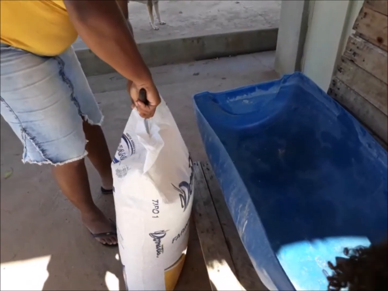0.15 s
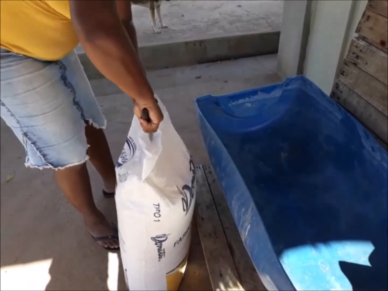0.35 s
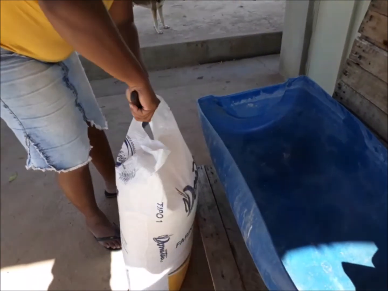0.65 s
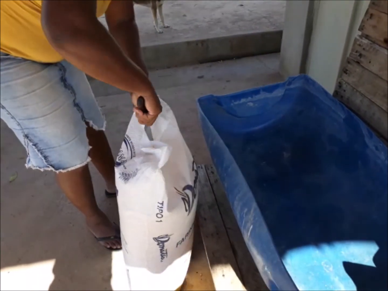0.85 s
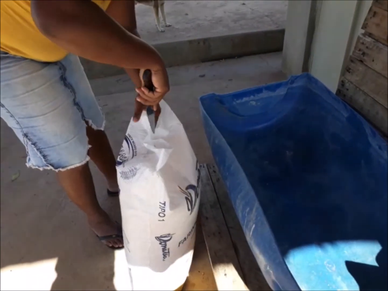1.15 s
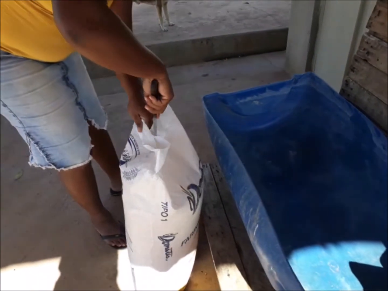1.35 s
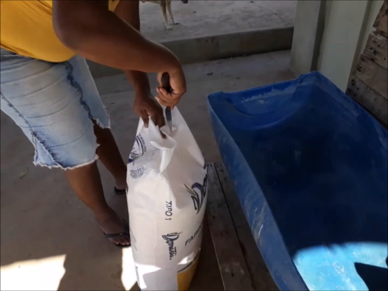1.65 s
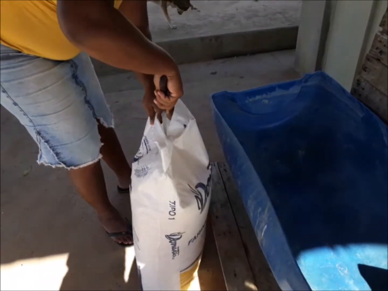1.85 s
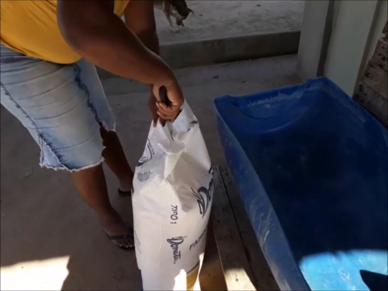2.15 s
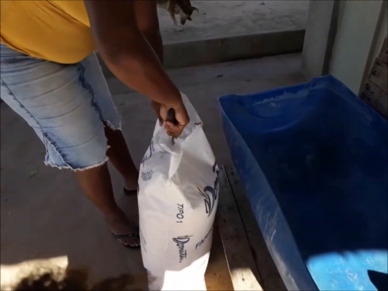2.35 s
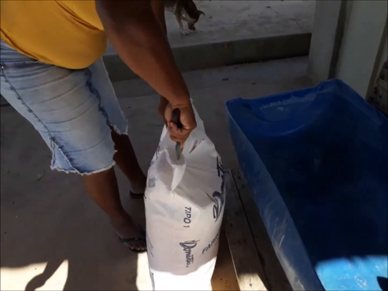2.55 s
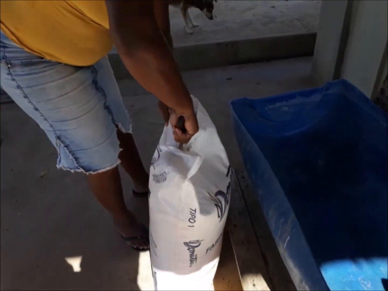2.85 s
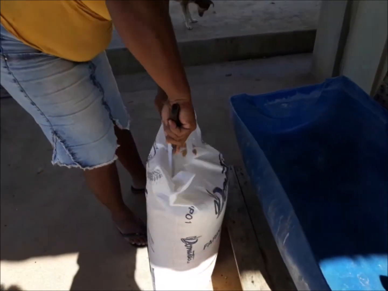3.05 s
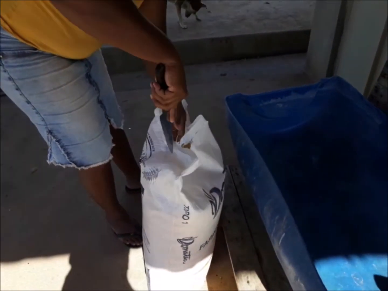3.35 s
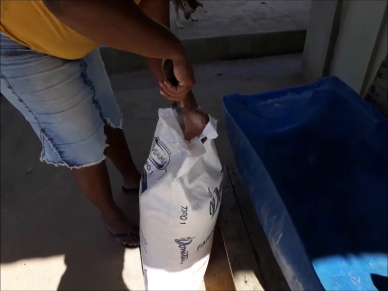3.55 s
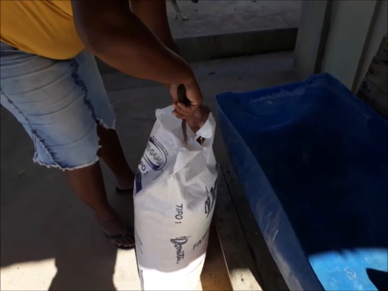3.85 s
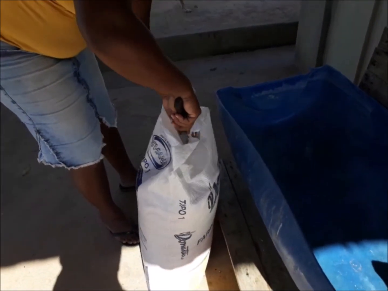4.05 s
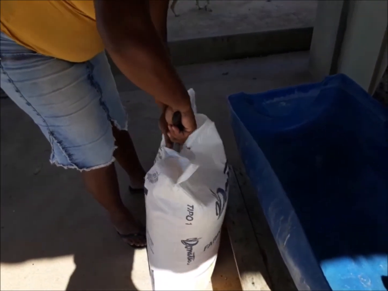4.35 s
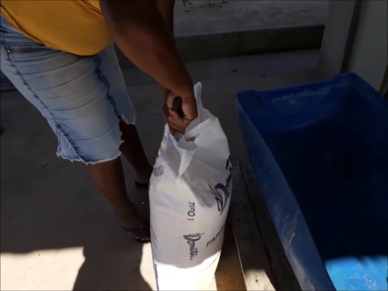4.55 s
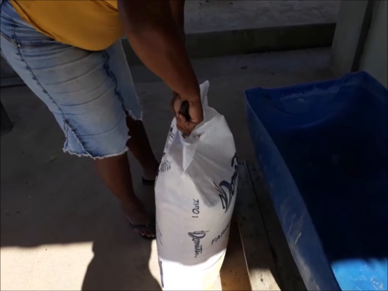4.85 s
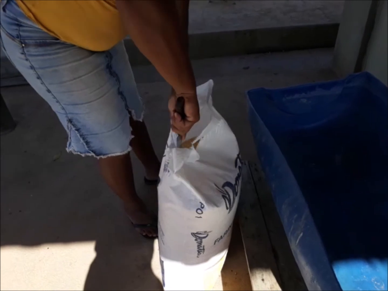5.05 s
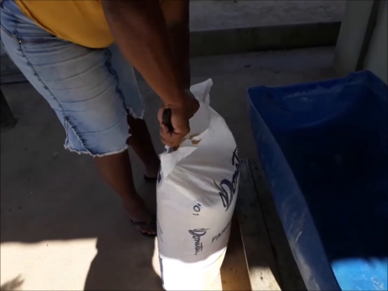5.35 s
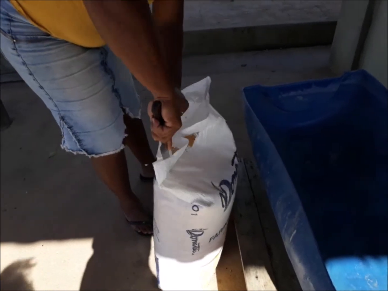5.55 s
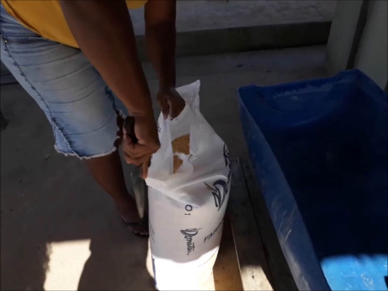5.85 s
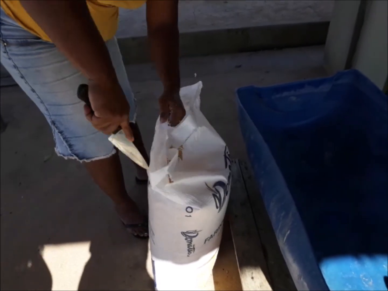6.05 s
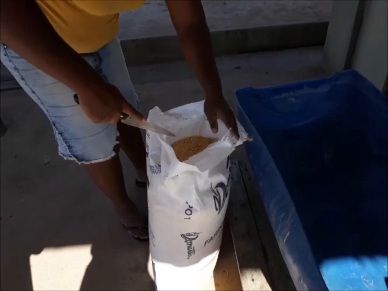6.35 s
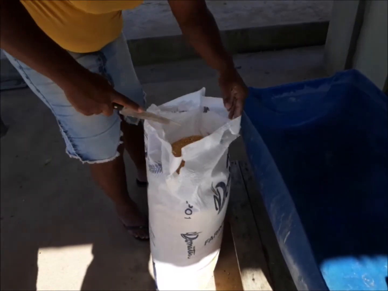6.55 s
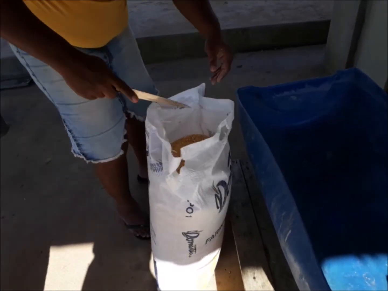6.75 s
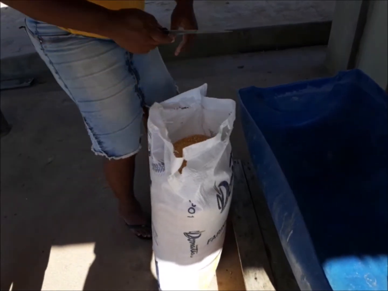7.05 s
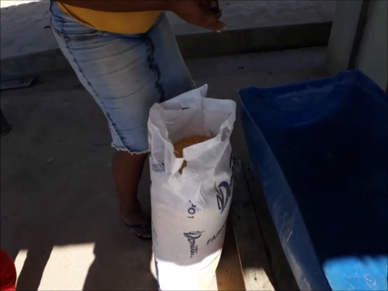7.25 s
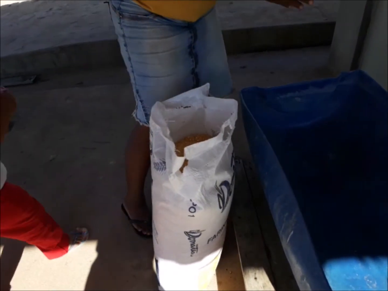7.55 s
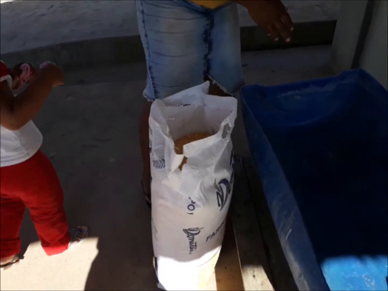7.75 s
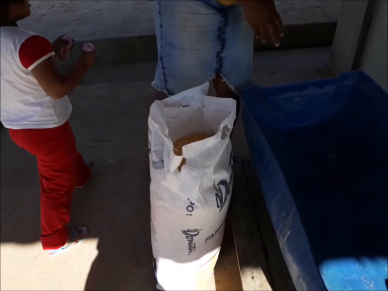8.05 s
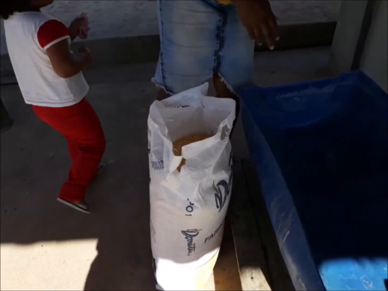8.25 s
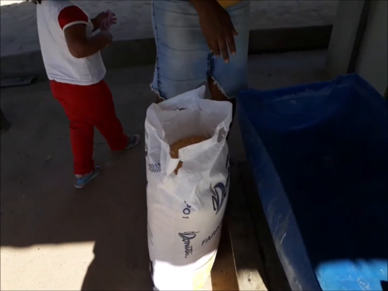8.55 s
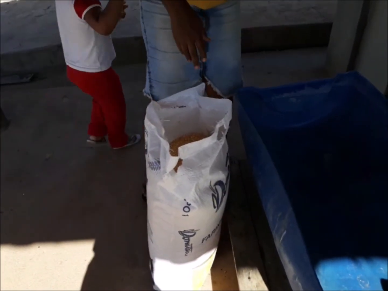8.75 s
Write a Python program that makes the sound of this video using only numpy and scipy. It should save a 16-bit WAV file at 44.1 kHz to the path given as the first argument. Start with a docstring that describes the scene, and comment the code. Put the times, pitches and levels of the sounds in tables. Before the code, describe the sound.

Close to the microphone on a roofed concrete porch, a heavy woven plastic sack crinkles at once, with loud sharp snaps in the first 0.1 s. A coarse rip with dull thuds comes at 0.4-0.55 s, then more cracks to 0.8. Softer rustling and scattered snaps follow until a strong tear at 2.5-2.65 and another short one near 3.05. A hard blade knock sounds at 3.5; a chick gives thin, falling peeps at 3.85-4.1. Dense crackling and snapping at 4.3-4.85 lead into rips around 5.0, 5.4 and 5.9. Handling softens and stops by 7.0, with a faint blade tick at 6.8. Hoarse rooster notes overlap from 6.2 to 7.3. Then sandals and cloth scuff, mainly at 7.5 and 8.05, beside a short low cluck; faint bird calls and a late peep at 8.6 end over quiet, steady yard air.

```python
"""A knife rips open a woven plastic sack of grain on a concrete porch: volleys of noise grains are breaking strands.
From the start the strained film crinkles, folds snap as short ringing cracks, and the full sack rustles dully.
Midway the blade knocks, a sum of decaying modes, and a chick peeps in gliding, nearly pure tones.
Later roosters crow and one low cluck sounds, in throat-shaped harmonics; sandals thud and cloth scuffs as noise.
Echoes of the porch and yard surround it all, over a steady bed of coloured noise."""
import sys
import numpy as np
from scipy import signal
from scipy.fft import rfft, irfft
from scipy.io import wavfile
from scipy.ndimage import uniform_filter1d

SR = 44100
rng = np.random.default_rng(int(sys.argv[2]) if len(sys.argv) > 2 else 0)


def persist_wave(psi):
    """Save psi, clipped to +-1, as 16-bit WAV."""
    counts = np.round(np.clip(psi, -1, 1) * 32767).astype(np.int16)
    wavfile.write(sys.argv[1], SR, np.atleast_2d(counts).T)


N = 392490
TIME = np.arange(N) / SR
# Table levels are relative: each layer and the scene scale them further.


def from_db(db):
    """Decibel law: 20 dB is a tenfold amplitude."""
    return 10 ** (np.asarray(db) / 20)


def rms_one(x):
    """Power normalisation: the mean square becomes 1."""
    return x / np.sqrt(np.mean(x ** 2) + 1e-20)


def at_hz(points, hz):
    """Spectral interpolation: level in dB is linear between points in log frequency."""
    point_hz, point_db = np.transpose(points)
    return np.interp(np.log(np.maximum(hz, 1)), np.log(point_hz), point_db)


def drift(rate):
    """Band-limited chance: random values, rate per second, joined by lines and scaled to rms 1."""
    knots = rng.standard_normal(N // 20)
    return rms_one(np.interp(TIME * rate, np.arange(len(knots)), knots))


def response(spectrum, size=4096):
    """Minimum phase: folding the cepstrum makes a spectrum causal; the response has unit energy."""
    bins_hz = np.arange(size // 2 + 1) * SR / size
    cepstrum = irfft(np.log(from_db(at_hz(spectrum, bins_hz))))
    cepstrum[1:size // 2] *= 2
    cepstrum[size // 2 + 1:] = 0
    impulse = irfft(np.exp(rfft(cepstrum)))
    return impulse / np.linalg.norm(impulse)


def colour(x, spectrum):
    """Linear filtering: white noise takes on a spectrum and keeps its expected power."""
    return signal.oaconvolve(x, response(spectrum))[:N]


def resonate(x, hz, width_hz):
    """Damped resonance: a pole pair passes a band around hz with a peak gain near 1."""
    r = np.exp(-np.pi * width_hz / SR)
    zeros = np.array([1, 0, -1]) * (1 - r * r) / 2
    poles = [1, -2 * r * np.cos(2 * np.pi * hz / SR), r * r]
    return signal.lfilter(zeros, poles, x + 1e-18)


def add(out, s, sound):
    """Superposition: a short sound is summed in at time s."""
    i = max(0, round(s * SR))
    out[i:i + len(sound)] += sound[:max(0, N - i)]


def stroke(length, rise, fall):
    """Exponential build-up and decay: a push rises, holds and dies away."""
    t = TIME[TIME < length + 10 * fall]
    return (1 - np.exp(-t / rise)) * np.exp(-np.maximum(t - length, 0) / fall)


def pushes(rows, rise, fall):
    """Superposed strokes: the gain over time of rows of start_s, length_s, level_db."""
    out = np.zeros(N)
    for s, length, db in rows:
        add(out, s, from_db(db) * stroke(length, rise, fall))
    return out


def thuds(rows, width):
    """Damped contact: a short push of noise through two resonances, each a share of its pitch wide."""
    out = np.zeros(N)
    for s, length, db, hz in rows:
        push = stroke(length, rise=0.0011, fall=0.0058)
        noise = rng.standard_normal(len(push))
        dull = resonate(resonate(noise, hz, width * hz), hz, width * hz)
        level = np.sqrt(np.average(dull ** 2, weights=push ** 2))
        add(out, s, from_db(db) * push * dull / level)
    return out


GRAIN_S = 0.00038   # decay time constant of one tiny break


def grains(per_s, spread_db, even_s, hiss):
    """Shot noise: random tiny breaks of uneven size over a sliding hiss, power evened out over even_s."""
    happens = rng.random(N) < per_s / SR
    sizes = from_db(spread_db * np.minimum(rng.exponential(1, N), 4)) * happens
    r = np.exp(-2 / (GRAIN_S * SR))
    power = signal.lfilter([1], [1, -2 * r, r * r], sizes ** 2 + 1e-18)
    bursts = np.sqrt(power) * rng.choice([-1, 1], N)   # random signs make the swelling power noisy
    x = rms_one(bursts) + hiss * rng.standard_normal(N)
    local_power = uniform_filter1d(x * x, max(2, int(even_s * SR)))
    return x / np.sqrt(np.maximum(local_power, 0) + 1e-4)


def reflections(x, t60, delay, size=4096):
    """Diffuse reverberation: decaying noise of unit energy, redrawn block by block as the source moves about."""
    out, t = np.zeros(N), TIME[:SR // 2]
    for i in range(0, N, size):
        decay = np.exp(-np.log(1000) * t / t60)
        tail = rng.standard_normal(len(t)) * decay * (t > delay)
        add(out, i / SR, signal.fftconvolve(x[i:i + size], tail / np.linalg.norm(tail)))
    return out


# Spectrum of the yard's air: frequency_hz, density_db (per Hz)
YARD_SPECTRUM = [(25, -21.5), (60, -2), (110, -2.5), (220, -14), (480, -2.5), (900, -22), (1600, -5.5),
                 (2600, -20), (4000, 1), (7000, -22.5), (15000, -32)]


def yard_air():
    """Stationary noise: a faint, steady bed coloured by the yard."""
    return from_db(-57.5) * colour(rng.standard_normal(N), YARD_SPECTRUM)


# Gain of a bird's throat on its harmonics: frequency_hz, gain_db
THROAT_GAIN = [(350, 16), (700, -5), (1000, -2.5), (1400, 0.5), (1700, -6), (2050, -12.5), (2300, -15),
               (2650, -13), (3200, -27), (5000, -40)]


def call(hz, rough, count, waver=0.056, rasp_db=6.5, gape_db=9, gape_hz=2650):
    """Source and filter: a throat shapes harmonics, hoarseness shakes them, and the opening beak lifts a band."""
    shaken_hz = hz * (1 + waver * rough * drift(260)[:len(hz)])
    phase = 2 * np.pi * np.cumsum(shaken_hz) / SR
    orders = np.arange(1, count + 1)[:, None]
    opening = np.linspace(0, 1, len(hz)) ** 2
    gape = opening * np.exp(-((orders * hz - gape_hz) / 350) ** 2)
    gains = from_db(at_hz(THROAT_GAIN, orders * hz) + gape_db * gape)
    harmonics = (gains * np.sin(orders * phase)).sum(axis=0)
    tone = np.sqrt(2) * harmonics / np.linalg.norm(gains, axis=0)
    return tone * from_db(rasp_db * rough * drift(420)[:len(hz)])


# Notes of the roosters, and one short low cluck at 8.06 s:
# start_s, length_s, pitch_hz (before its bend), level_db, roughness (0-1)
FOWL_NOTES = [(6.189, .1, 750, -38, 0.34), (6.388, 0.51, 687.4, -46, .75), (6.551, 0.45, 578, -50.5, 0.16),
              (7.0, .33, 596, -48.5, 0.18), (7.019, .3, 679, -45.5, 0.62), (7.219, 0.12, 796, -51.5, 0.25),
              (8.06, 0.033, 429.4, -39.5, 0.34), (8.236, 0.062, 891, -46, 0.52),
              (8.42, 0.15, 851, -59, 0.37), (8.83, 0.1, 935, -65, 0.2)]
SCOOP, SCOOP_S = 0.0593, 0.0184   # share by which a note starts flat; time constant of its rise
SAG, SAG_POWER = .09, 5   # share lost as the air runs out; how late the sag comes


def roosters_and_cluck():
    """Pitch glide: each note scoops up towards its pitch and sags as the air runs out."""
    out = np.zeros(N)
    for s, length, hz, db, rough in FOWL_NOTES:
        effort = stroke(length, rise=0.0083, fall=0.013)
        t = TIME[:len(effort)]
        bend = 1 - SCOOP * np.exp(-t / SCOOP_S) - SAG * np.minimum(t / length, 1) ** SAG_POWER
        add(out, s, from_db(db) * effort * call(hz * bend, rough, count=5))
    return out


# Peeps of the chick: start_s, length_s, starting_pitch_hz, level_db
CHICK_PEEPS = [(3.841, 0.092, 4150, -44), (3.905, .06, 3960, -37.5), (3.99, 0.13, 3570, -41),
               (8.638, 0.085, 4600, -48)]
PEEP_FALL_HZ_PER_S = 3100


def chick():
    """Downward frequency glide: a nearly pure tone swells and fades as its pitch falls."""
    out = np.zeros(N)
    for s, length, hz, db in CHICK_PEEPS:
        t = TIME[TIME < length]
        swell = np.sin(np.pi * t / length)
        add(out, s, from_db(db) * swell * call(hz - PEEP_FALL_HZ_PER_S * t, rough=0.049, count=1))
    return out


# Denim and sandals brush as feet shift: start_s, length_s, level_db
BRUSH_SLIDES = [(7.04, 0.092, -42), (7.24, 0.066, -49.5), (7.52, 0.044, -36), (7.58, 0.015, -31.5),
                (8.045, .15, -40), (8.32, 0.028, -41.5), (8.55, 0.19, -48.5)]
# Spectrum of the brushing: frequency_hz, density_db (per Hz)
BRUSH_SPECTRUM = [(60, -24), (120, -10.5), (250, -8), (500, -13.5), (800, -19.5), (1200, -19.5),
                  (2000, -12.5), (3000, -4), (3900, 1), (5100, -3.5), (6800, -19.5), (9500, -33),
                  (14500, -28)]


def shuffle():
    """Sliding friction: cloth and soles give a soft, finely gritty hiss."""
    sliding = pushes(BRUSH_SLIDES, rise=0.0047, fall=0.048)
    grit = grains(per_s=1800, spread_db=6.0, even_s=0.036, hiss=0.99)
    return from_db(-4.0) * colour(sliding * grit, BRUSH_SPECTRUM)


# Sandals on concrete: start_s, length_s, level_db, pitch_hz
SANDAL_STEPS = [(6.276, 0.03, -61, 650), (7.546, .07, -56.5, 378), (8.061, 0.034, -46.5, 424),
                (8.064, 0.02, -43.5, 900), (8.129, 0.1, -57, 125), (8.317, 0.049, -42, 690),
                (8.741, 0.0057, -49, 418)]


def sandals():
    """Heavily damped impact: soles meet concrete in dull, wide-band thuds."""
    return from_db(-3.0) * thuds(SANDAL_STEPS, width=1.0)


# Knocks of the blade: start_s, level_db
BLADE_KNOCKS = [(3.482, -15.5), (3.916, -29.5), (6.816, -32.5)]
# Modes of the blade: frequency_hz, level_db, t60_s
BLADE_MODES = [(526, -1.5, 0.017), (900, -20, .03), (1720, -38, .025), (2400, -21, 0.024),
               (2790, -1, 0.023), (2900, 4, 0.034), (3200, 9.5, 0.012), (3850, 1, 0.022)]


def blade():
    """Modal vibration: every knock rings decaying modes with strengths of its own."""
    out, t = np.zeros(N), TIME[:SR // 3]
    for s, db in BLADE_KNOCKS:
        for hz, mode_db, t60 in BLADE_MODES:
            chance_db = rng.normal(0, 2)
            decay = np.exp(-np.log(1000) * t / t60)
            add(out, s, from_db(db + mode_db + chance_db - 9) * decay * np.sin(2 * np.pi * hz * t))
    return out


# Panels of the sack jerk taut against the grain: start_s, length_s, level_db, pitch_hz
PANEL_JERKS = [(0.411, 0.026, -21.5, 333), (0.511, 0.0056, -36, 2000), (0.610, 0.0033, -19.5, 1900),
               (0.620, 0.064, -33.5, 1940), (0.632, 0.0082, -28, 540), (0.765, 0.021, -37.5, 127),
               (2.512, 0.017, -23, 810), (2.620, 0.027, -21.5, 405), (2.632, 0.015, -22, 765),
               (2.630, 0.017, -21.5, 2400), (3.056, 0.0087, -30.5, 218), (3.07, .09, -43, 115),
               (3.482, 0.0081, -45, 302), (4.648, 0.0058, -35.5, 780), (5.885, 0.032, -30.5, 415)]


def jerks():
    """Damped membrane: panels pulled taut against the grain thud around a pitch."""
    return from_db(-2.5) * thuds(PANEL_JERKS, width=0.4)


# The hands keep the film under strain until they let go: time_s, rustle_level_db
FILM_STRAIN = [(0.0, -41), (0.9, -39.5), (1.15, -48.5), (1.75, -41), (2.1, -50), (2.45, -37), (2.87, -43.5),
               (3.27, -38), (3.9, -46.5), (4.4, -38), (5.3, -40), (5.57, -44.5), (6.0, -42), (6.2, -48.5),
               (6.5, -44.5), (6.95, -59)]
# A hand grips and shifts the sack: start_s, length_s, crinkle_level_db, body_level_db
HAND_GRIPS = [(0.0, 0.043, -28, -38), (0.054, 0.068, -28, -30.5), (0.205, 0.044, -29.5, -42),
              (0.301, 0.047, -28, -35.5), (0.606, 0.045, -22, -35), (0.724, 0.11, -28.5, -45),
              (1.306, .1, -32.5, -52.5), (1.438, 0.026, -36, -44), (1.644, 0.25, -35.5, -48),
              (1.897, 0.088, -32, -40.5), (2.157, 0.038, -44, -51), (2.283, 0.059, -32.5, -42.5),
              (2.371, 0.22, -37, -45), (2.771, 0.023, -22.5, -35.5), (2.888, 0.018, -31.5, -44.5),
              (2.958, 0.19, -26, -44.5), (3.542, .1, -32, -45.5), (3.655, 0.1, -37, -51),
              (4.026, 0.066, -41.5, -52.5), (4.156, 0.069, -34, -47), (4.341, 0.14, -27.5, -45),
              (4.533, 0.086, -30, -46), (4.625, 0.07, -28.5, -38), (4.782, 0.066, -27, -37.5),
              (4.884, 0.15, -40, -50), (5.142, 0.077, -30.5, -51), (5.203, 0.069, -27.5, -46),
              (5.648, 0.38, -33, -51), (6.063, .04, -43, -73), (6.279, 0.036, -35, -46),
              (6.358, 0.1, -32, -48.5)]
# Spectra of the crinkling film and of the filled sack: frequency_hz, density_db (per Hz)
FILM_SPECTRUM = [(200, -53.5), (500, -22.5), (800, -8.5), (1100, -17), (2000, -12), (3000, -7), (4000, 0),
                 (5100, -7), (6800, -24), (9500, -37), (14500, -27)]
BODY_SPECTRUM = [(25, -28.5), (60, -23), (95, -8.5), (130, -4.5), (170, -5), (230, -0.5), (400, -3),
                 (700, -8), (1100, -16.5), (3000, -30)]
GRIP_RISE_S, GRIP_FALL_S = 0.0042, 0.015
STRAIN_BODY_DB, LET_GO_S = -13, 0.029   # sack body against the film's strain; fade on letting go
CLUMP_DB, CLUMPS_PER_S = 1.48, 45   # creases give way in clumps


def handling():
    """Crackling noise: strained film crinkles and the filled sack rustles dully; both swell with every grip."""
    strain_s, strain_db = np.transpose(FILM_STRAIN)
    hold = np.clip((strain_s[-1] - TIME) / LET_GO_S + 1, 0, 1)
    strain = from_db(np.interp(TIME, strain_s, strain_db)) * hold
    film_grip = pushes([(s, length, db) for s, length, db, _ in HAND_GRIPS], GRIP_RISE_S, GRIP_FALL_S)
    body_grip = pushes([(s, length, db) for s, length, _, db in HAND_GRIPS], GRIP_RISE_S, GRIP_FALL_S)
    # grip and strain add in power
    clumps = rms_one(from_db(CLUMP_DB * drift(CLUMPS_PER_S)))
    film = np.hypot(from_db(-4) * film_grip, strain) * clumps
    bulk = np.hypot(from_db(-2.0) * body_grip, from_db(STRAIN_BODY_DB) * strain)
    crinkle = colour(film * grains(per_s=430, spread_db=4.5, even_s=0.0513, hiss=0.55), FILM_SPECTRUM)
    body = colour(bulk * grains(per_s=420, spread_db=3.5, even_s=0.09, hiss=0.4), BODY_SPECTRUM)
    return crinkle + body


# The loudest folds that buckle with a sharp snap: start_s, peak_level_db
FOLD_SNAPS = [(0.0422, -4.5), (0.0635, 3), (0.1048, -8), (0.3037, -9.5), (0.3317, -5), (0.611, -6.5),
              (0.6666, -9), (0.7377, -4), (0.7973, -4.5), (1.1118, -22), (1.4726, -11), (1.5751, -20),
              (1.897, -9), (1.92, -4), (2.3271, -10.5), (2.4618, -15), (2.635, 3), (2.7886, -11.5),
              (2.973, -14), (3.0649, 3), (3.4458, -13), (3.5442, -11), (3.7337, -23), (4.0586, -14.5),
              (4.2173, -21), (4.3303, -10), (4.4591, -7), (4.5293, -6.5), (4.559, -3.5), (4.6277, -7),
              (4.6734, -2.5), (4.783, -4.5), (4.8311, 4), (5.25, -19), (5.294, -13.5), (5.372, -12),
              (5.4742, -10), (5.77, -14.5), (5.8088, -12), (6.3009, -11.5), (7.525, -19.5), (7.808, -25.5),
              (8.6878, -26.5), (8.7395, -21)]
# Spectrum of a crack: frequency_hz, density_db (per Hz)
CRACK_SPECTRUM = [(100, -41), (800, -9), (2000, -11), (3000, -3), (4200, 2.5), (5300, -0.5), (7000, -24),
                  (9500, -30), (14500, -22.5)]
FOLD_HZ, FOLD_SCATTER = 4000, 0.052   # mean pitch of a fold; spread from fold to fold, as a share


def snaps(width_hz=1500, ring_db=3, flip_s=0.0025, splinter_db=-9):
    """Buckling instability: a fold flips with a crack and splinters, ringing briefly at its own pitch."""
    out, crack, t = np.zeros(N), response(CRACK_SPECTRUM), TIME[:300]
    for s, db in FOLD_SNAPS:
        hz = FOLD_HZ * (1 + FOLD_SCATTER * rng.standard_normal())
        splinters = from_db(splinter_db) * rng.standard_normal(len(t)) * np.exp(-t / flip_s)
        flip = (t == 0) + splinters
        snap = np.convolve(flip, crack[:1000])
        snap = snap + from_db(ring_db) * resonate(snap, hz, width_hz)
        add(out, s, from_db(db - 5) * snap / np.abs(snap).max())
    return out


# Tugs of the knife through the weave: start_s, length_s, level_db
KNIFE_TUGS = [(0.046, 0.015, -22), (0.104, 0.0067, -19.5), (0.411, 0.011, -18), (0.426, 0.0091, -7.5),
              (0.452, 0.026, -9), (0.488, 0.025, -15), (0.508, 0.048, -14), (2.512, 0.035, -12.5),
              (2.553, 0.035, -10), (2.588, 0.036, -16), (2.623, 0.03, -12), (3.048, 0.0069, -20),
              (3.056, 0.015, -9), (3.083, 0.041, -18.5), (3.118, 0.051, -19.5), (4.626, 0.0053, -16),
              (4.646, 0.0061, -15.5), (4.793, 0.033, -24.5), (4.957, 0.021, -10), (4.988, 0.021, -10.5),
              (5.018, 0.027, -12.5), (5.371, 0.025, -17), (5.403, 0.046, -13), (5.473, 0.011, -14.5),
              (5.872, 0.011, -10), (5.89, 0.019, -11), (5.921, 0.025, -14)]
# Spectrum of the breaking strands: frequency_hz, density_db (per Hz)
RIP_SPECTRUM = [(30, -38.5), (70, -33), (120, -16), (220, -9), (450, -11.5), (800, -7.5), (1100, -13.5),
                (2000, -10.5), (3000, -3.5), (3900, 3), (5100, -2), (6800, -21.5), (9500, -31.5),
                (14500, -24.5)]


def rips():
    """Fracture noise: each tug breaks a dense volley of strands, in surges as the blade crosses the weave."""
    pull = pushes(KNIFE_TUGS, rise=0.0013, fall=0.0022)
    surges = rms_one(from_db(1.5 * drift(300)))
    strands = grains(per_s=2600, spread_db=2.5, even_s=0.0057, hiss=0.26)
    return from_db(-1.5) * colour(pull * surges * strands, RIP_SPECTRUM)


# Resonances of the porch and of the sack's hollow: frequency_hz, width_hz, gain_db
HOLLOW_RESONANCES = [(129.9, 4, 9.5), (203, 39, -11.5), (728, 16, 0)]


def scene():
    """Direct and reflected sound: sack and feet under the porch roof, birds out in the yard."""
    sack = rips() + handling() + snaps() + blade() + jerks()
    near = sack + shuffle() + sandals()
    near = near + sum(from_db(db) * resonate(near, hz, width) for hz, width, db in HOLLOW_RESONANCES)
    early = from_db(-3.5) * reflections(near, t60=.11, delay=.001)
    late = from_db(-13) * reflections(near, t60=0.43, delay=0.012)
    birds = roosters_and_cluck() + chick()
    birds = from_db(-4) * birds + from_db(-5.0) * reflections(birds, t60=0.5, delay=0.0042)
    return (near + early + late + birds + yard_air())[None]


MIC_LOW_CUT_HZ, CUTOFF_HZ = 46, 15900


def record(dry):
    """Band limits and saturation: the microphone loses deep bass, rounds high peaks and cuts the top."""
    ceiling = 1.1   # level that rounded peaks approach
    low_cut = signal.butter(2, MIC_LOW_CUT_HZ, "high", fs=SR, output="sos")
    thin = signal.sosfilt(low_cut, dry)
    rounded = ceiling * np.tanh(thin / ceiling)
    top_cut = signal.ellip(14, .1, 100, CUTOFF_HZ, fs=SR, output="sos")
    return signal.sosfilt(top_cut, rounded)


dry = scene()
out = record(dry)
persist_wave(out)
```